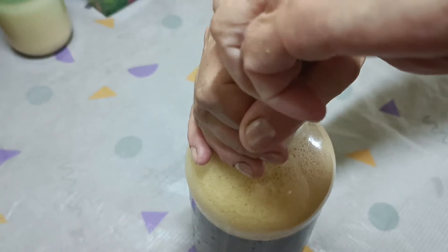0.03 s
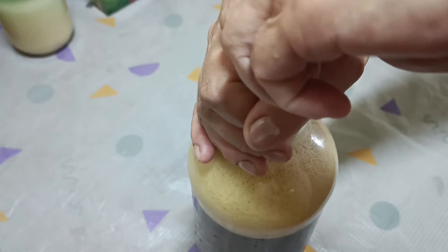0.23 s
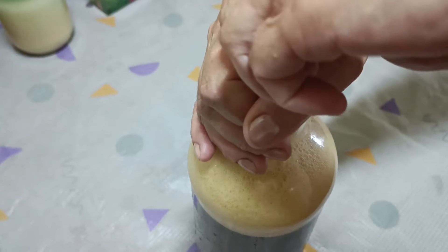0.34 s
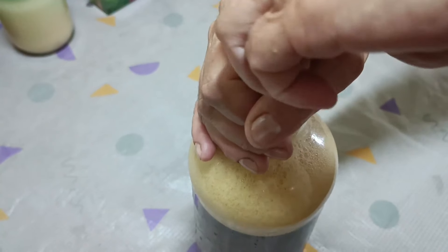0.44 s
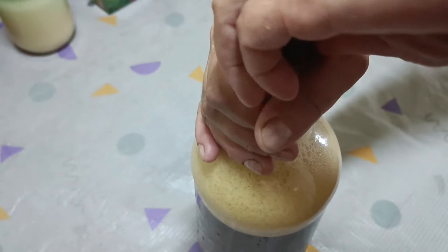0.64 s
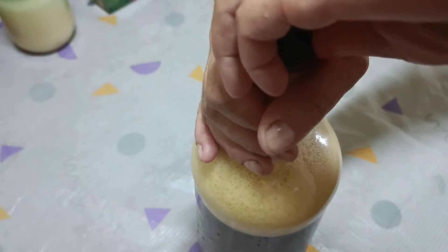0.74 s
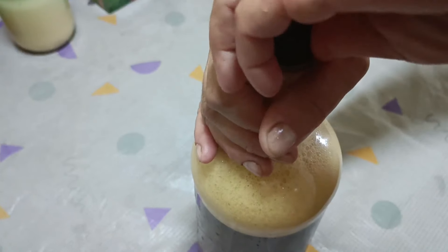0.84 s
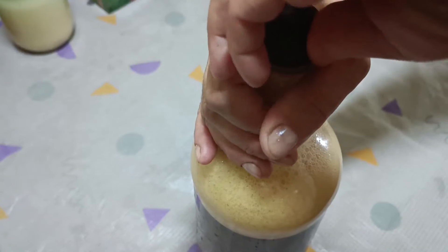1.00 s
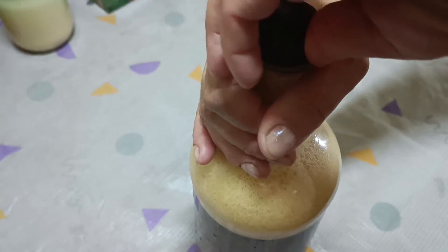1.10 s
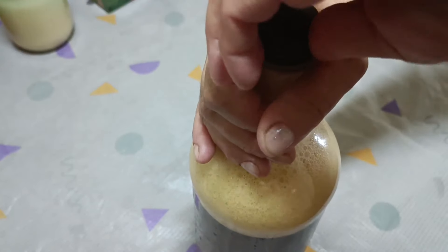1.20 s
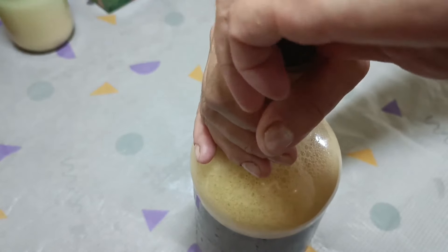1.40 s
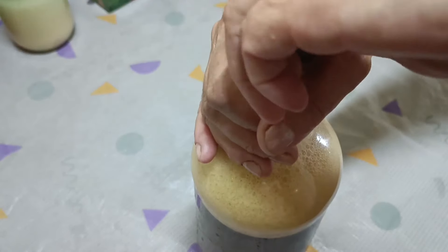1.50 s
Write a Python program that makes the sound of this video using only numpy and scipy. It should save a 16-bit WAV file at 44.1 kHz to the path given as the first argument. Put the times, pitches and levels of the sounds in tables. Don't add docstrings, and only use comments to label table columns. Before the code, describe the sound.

Fizzy bottle cap cracked open: one loud, sputtering gas hiss, then quiet finger rubs and bubble ticks

```python
import sys
import numpy as np
from scipy import signal
from scipy.fft import rfft, irfft, next_fast_len
from scipy.io import wavfile
from scipy.ndimage import uniform_filter1d

SR = 44100
rng = np.random.default_rng(int(sys.argv[2]) if len(sys.argv) > 2 else 0)


def convert_level_to_amplitude(level_db):
    exponent = np.asarray(level_db, float) / 20
    return 10 ** exponent


def inscribe(sig):
    pcm = np.round(np.clip(np.atleast_2d(sig).T, -1, 1) * 32767)
    wavfile.write(sys.argv[1], SR, pcm.astype(np.int16))


N = 68355
t = np.arange(N) / SR

# (frequency [Hz], density [dB per Hz])
HUM_SPECTRUM = [(30, -30.5), (65, -7.5), (130, 3.5), (450, -2), (900, -13.5), (3000, -20.5), (8000, -20.5),
                (15800, -36)]
# (time [s], peak [dB], high ring re low ring [dB])
BUBBLES = [(.0975, -49, -20), (.177, -45, -20), (.181, -44, -20), (.671, -50, -20), (.72, -42, -20),
           (.872, -44, -18), (.9995, -48, -15), (1.197, -46, -15), (1.2395, -40, -12), (1.287, -40, -15),
           (1.3195, -46, -15), (1.326, -44, -15), (1.359, -43, -12), (1.3905, -40, -12), (1.4125, -42, -3),
           (1.4222, -41, -5), (1.4403, -43, -4), (1.4755, -45, -12), (1.5228, -44, -8), (1.547, -47, -10)]
# (time [s], length [s], level [dB], pitch [Hz], thud [dB])
FINGER_SLIPS = [
    (0.114, 0.046, -55.5, 6500, 2),
    (0.842, 0.14, -61.5, 5000, -1),
    (1.019, 0.051, -59.5, 5200, 7),
    (1.033, 0.0081, -51.5, 5330, -29.5),
    (1.23, 0.059, -47.5, 4850, -18),
    (1.253, 0.014, -49, 4800, -13),
    (1.325, 0.043, -59, 5560, -5),
    (1.53, 0.049, -55, 4920, -0.5),
]
# (time [s], level [dB], whistle share [dB], hollow share [dB])
GAS_FLOW = [
    (.203, -51, -11, 2),
    (0.22, -19.5, -3.5, 3),
    (.262, -10, 0, -2),
    (.315, -14.5, 4.5, -6.5),
    (.39, -17, 8, 2),
    (.478, -19, -1, 1),
    (.512, -43, 2.5, -0.5),
    (.55, -48.5, 3, -5.5),
    (.575, -65, -3, 0),
]
# (frequency [Hz], density [dB per Hz])
JET_SPECTRUM = [(600, -35), (1300, -31.5), (2500, -29.5), (3300, -18.5), (6000, -12.5), (9000, -8),
                (13000, -12.5), (15800, -13)]
# (frequency [Hz], shared part [0-1])
JET_LIKENESS = [(600, .6), (1400, 0.5), (2100, 0), (3100, 0.84), (4400, 0.2), (7000, 0), (12000, 0)]
# (frequency [Hz], width [Hz], left gain [dB], right gain [dB])
HAND_CAVITIES = [(2040, 250, 12.5, -13), (2500, 393, -25.5, 15.5), (3540, 1400, 13, 14.5),
                 (4290, 760, 9, -21), (5144, 260, 18, 17), (5660, 500, -3, 7.5), (6500, 400, -16.5, -16),
                 (10870, 490, 13, 2), (14160, 1700, 11, -12), (14600, 270, -2, -15.5)]
# (frequency [Hz], width [Hz], lift [dB])
PORT_RINGS = [(7450, 420, 13.5), (8395, 330, 11)]
# (time [s], peak [dB], pitch [Hz])
RIB_SNAPS = [
    (1.0345, -46, 5200),
    (1.2415, -41, 4500),
    (1.2476, -33, 4800),
    (1.2498, -37, 4900),
]

HUM_DB, HUM_LIKENESS, HUM_PATCH_DB = -49, 0.083, 1.08
BUBBLE_GAIN_DB, BUBBLE_LOW_HZ, BUBBLE_HIGH_HZ, BUBBLE_RISE_S = 1, 8500, 14900, 0.00012
FIZZ_PER_S, FIZZ_DB, FIZZ_SPREAD_DB, FOAM_LEFT_DB = 81, -65, -11, -8
SLIP_THUD_HZ, SLIP_WIDTH_HZ, SLIP_AIR_DB, SLIP_LEFT_DB = 1765, 2100, -8.5, 5
SPUTTER_DB, JET_PATCH_DB = 1.3, 1.6
HOLLOW_HZ, HOLLOW_WIDTH_HZ = 3300, 1800
DULL_BELOW_DB, DULL_HZ, DULL_SHARE = -30, 9500, 0.68
PUFF_S, PUFF_LEN_S, PUFF_HZ, PUFF_WIDTH_HZ, PUFF_DB = 0.265, 0.03, 140, 170, -54
DUCK_S, DUCK_DB, DUCK_FALL_S, RECOVER_DB_PER_S = 0.3, -9, 0.048, 6
SNAP_RISE_S, SNAP_LEFT_DB = 0.0005, 7
ROOM_T60_S, ROOM_DB = 0.18, -19
PORT_SKEW_RAD, SELF_HISS_DB, OVERLOAD = -0.7, -56.5, 0.93


def evened(x):
    return x / np.sqrt(np.mean(x ** 2) + 1e-20)


def read(points, hz):
    f, value = np.transpose(points)
    return np.interp(np.log(hz + 1), np.log(f + 1), value)


def peak(hz, centre_hz, width_hz):
    return 1j * hz * width_hz / (centre_hz ** 2 - hz ** 2 + 1j * hz * width_hz)


def colour(x, response):
    size = next_fast_len(x.shape[-1] + 4096)
    hz = np.fft.rfftfreq(size, 1 / SR)
    return irfft(rfft(x, size) * response(hz), size)[..., :x.shape[-1]]


def pair(likeness):
    a, b = rng.standard_normal((2, N))

    def shared(hz):
        part = read(likeness, hz) if np.ndim(likeness) else likeness + 0 * hz
        return np.clip(part, 0, 1)

    def own(hz):
        return np.sqrt(1 - shared(hz) ** 2)

    return np.array([a, colour(a, shared) + colour(b, own)])


def patchy(x, depth_db):
    z = signal.stft(x, nperseg=256)[2]
    bands, frames = z.shape[1:]
    field = rng.standard_normal((frames, bands)).T
    field = uniform_filter1d(field, size=4, axis=0)
    field = evened(uniform_filter1d(field, size=10, axis=1))
    return signal.istft(z * convert_level_to_amplitude(depth_db * field), nperseg=256)[1][:, :N]


def lean_left(left_db):
    return convert_level_to_amplitude(np.array([[left_db / 2], [-left_db / 2]]))


def kitchen():
    noise = patchy(pair(HUM_LIKENESS), HUM_PATCH_DB)
    return convert_level_to_amplitude(HUM_DB) * evened(colour(noise, lambda hz: convert_level_to_amplitude(read(HUM_SPECTRUM, hz))))


def foam():
    clicks = np.zeros((2, N))
    fizz_db = FIZZ_DB + FIZZ_SPREAD_DB * np.minimum(rng.exponential(1, N), 4)
    clicks[0] = convert_level_to_amplitude(fizz_db) * (rng.random(N) < FIZZ_PER_S / SR)
    for time_s, peak_db, high_db in BUBBLES:
        clicks[:, round(time_s * SR)] += convert_level_to_amplitude(BUBBLE_GAIN_DB + peak_db + np.array([0, high_db]))
    ring_s = t[:200]
    u = ring_s / BUBBLE_RISE_S
    pitches_hz = np.array([[BUBBLE_LOW_HZ], [BUBBLE_HIGH_HZ]])
    rings = u * np.exp(1 - u) * np.sin(2 * np.pi * pitches_hz * ring_s)
    bursts = signal.fftconvolve(clicks, rings, axes=1)[:, :N].sum(0)
    return bursts * convert_level_to_amplitude(np.array([[FOAM_LEFT_DB], [0]]))


def slips():
    out = np.zeros((2, N))
    for time_s, length_s, level_db, pitch_hz, thud_db in FINGER_SLIPS:
        def bright_ring(hz):
            air = convert_level_to_amplitude(SLIP_AIR_DB) * peak(hz, 10000, 4900) ** 2
            return peak(hz, pitch_hz, SLIP_WIDTH_HZ) ** 3 + air

        rub = pair(0.17)
        bright = evened(colour(rub, bright_ring))
        dull = evened(colour(rub, lambda hz: peak(hz, SLIP_THUD_HZ, 900)))
        u = 4 * np.maximum(t - time_s, 0) / length_s
        out += convert_level_to_amplitude(level_db) * u * np.exp(1 - u) * (bright + convert_level_to_amplitude(thud_db) * dull)
    return out * lean_left(SLIP_LEFT_DB)


def jet():
    time_s, level_db, whistle_db, hollow_db = np.transpose(GAS_FLOW)
    sputter = evened(uniform_filter1d(rng.standard_normal(N), size=150))
    flow = convert_level_to_amplitude(np.interp(t, time_s, level_db, -120, -120) + SPUTTER_DB * sputter)

    def hands(hz):
        rings = 1
        for centre_hz, width_hz, left_db, right_db in HAND_CAVITIES:
            rings = rings + convert_level_to_amplitude(np.array([[left_db], [right_db]])) * peak(hz, centre_hz, width_hz)
        return convert_level_to_amplitude(read(JET_SPECTRUM, hz)) * rings

    gas = colour(patchy(pair(JET_LIKENESS), JET_PATCH_DB), hands)
    gas = gas / np.sqrt(np.mean(ports(gas) ** 2))

    weak = np.clip((DULL_BELOW_DB - np.interp(t, time_s, level_db)) / 15, 0, 1) * (t > time_s[2])
    treble = colour(gas, lambda hz: 1 / (1 + (DULL_HZ / (hz + 1)) ** 8))
    gas = gas - DULL_SHARE * weak * treble

    whistle = colour(gas, lambda hz: np.array([peak(hz, f, 2 * w) for f, w, _ in PORT_RINGS]))
    hollow = colour(gas, lambda hz: peak(hz, HOLLOW_HZ, HOLLOW_WIDTH_HZ))
    whistle_extra = convert_level_to_amplitude(np.interp(t, time_s, whistle_db)) - 1
    hollow_extra = convert_level_to_amplitude(np.interp(t, time_s, hollow_db)) - 1
    return flow * (gas + whistle_extra * whistle + hollow_extra * hollow)


def puff():
    air = evened(colour(pair(0.25), lambda hz: peak(hz, PUFF_HZ, PUFF_WIDTH_HZ)))
    return convert_level_to_amplitude(PUFF_DB) * air * np.exp(-((t - PUFF_S) / PUFF_LEN_S) ** 2)


def duck_db():
    fall = np.clip((t - DUCK_S) / DUCK_FALL_S, 0, 1)
    return fall * np.minimum(DUCK_DB + RECOVER_DB_PER_S * (t - DUCK_S), 0)


def snaps():
    out = np.zeros(N)
    for time_s, peak_db, pitch_hz in RIB_SNAPS:
        since_s = np.maximum(t - time_s, 0)
        u = since_s / SNAP_RISE_S
        out += convert_level_to_amplitude(peak_db) * u * np.exp(1 - u) * np.sin(2 * np.pi * pitch_hz * since_s)
    return out * lean_left(SNAP_LEFT_DB)


def room(x):
    u = np.arange(SR // 3) / SR
    tail = rng.standard_normal((2, len(u))) * convert_level_to_amplitude(-60 * u / ROOM_T60_S) * np.minimum(u / 0.002, 1)
    return signal.fftconvolve(x, tail / np.linalg.norm(tail[0]), axes=1)[:, :N]


def ports(x):
    skew = np.exp(1j * PORT_SKEW_RAD)
    return colour(x, lambda hz: np.array([1 + convert_level_to_amplitude(db) * skew * peak(hz, f, w) for f, w, db in PORT_RINGS]))


def scene():
    near = jet() + slips() + snaps() + foam()
    return near + convert_level_to_amplitude(ROOM_DB) * room(near) + puff() + convert_level_to_amplitude(duck_db()) * kitchen()


def roll_off(x):
    return signal.sosfilt(signal.butter(12, 15750, fs=SR, output="sos"), x)


def record(dry):
    hiss = convert_level_to_amplitude(SELF_HISS_DB + duck_db()) * rng.standard_normal(dry.shape)
    heard = np.clip(ports(dry) + hiss, -OVERLOAD, OVERLOAD)
    return roll_off(heard)


dry = scene()
out = record(dry)
inscribe(out)
```